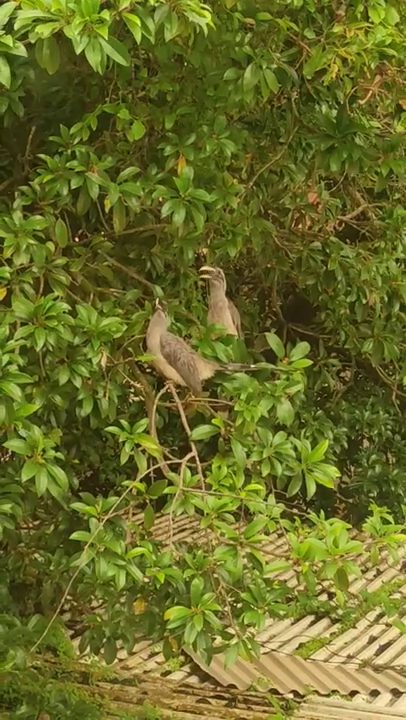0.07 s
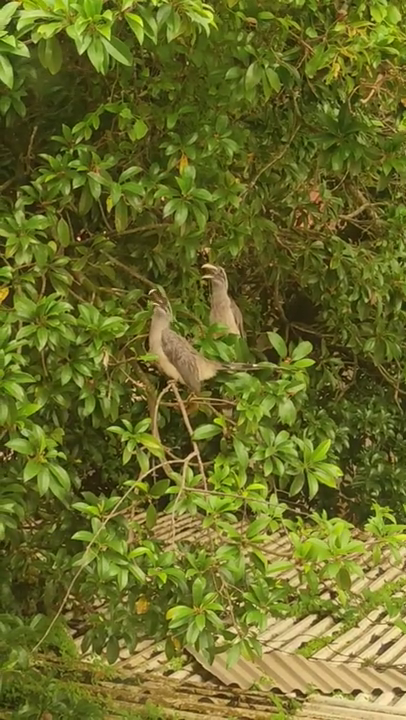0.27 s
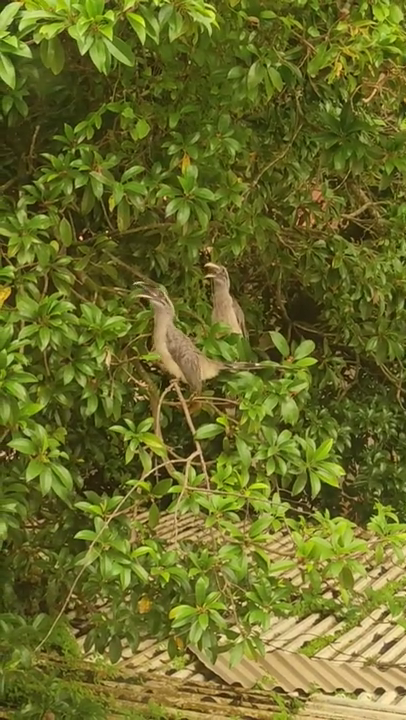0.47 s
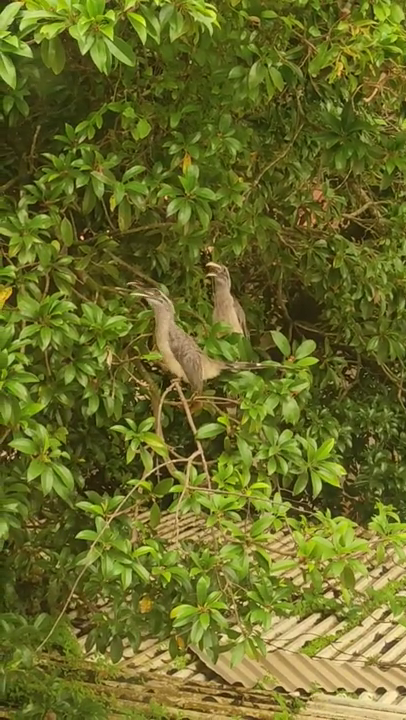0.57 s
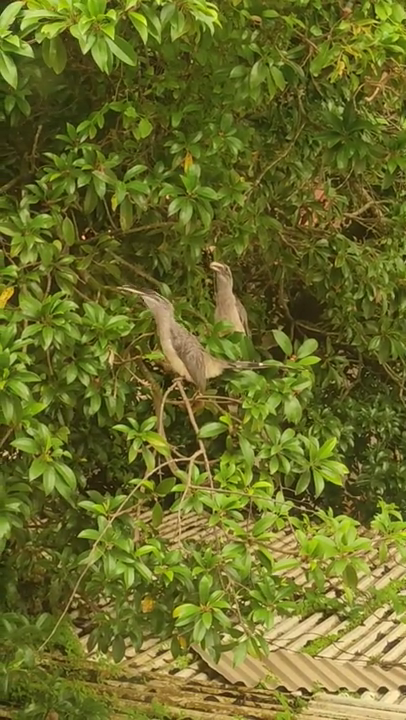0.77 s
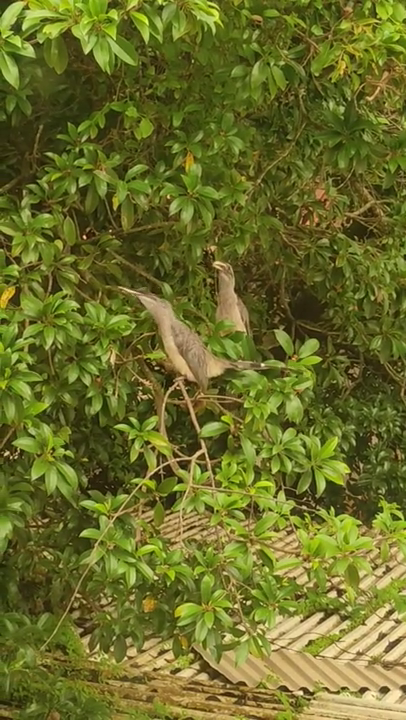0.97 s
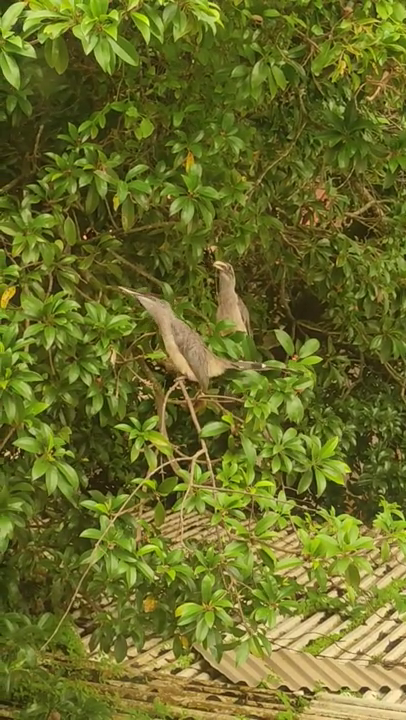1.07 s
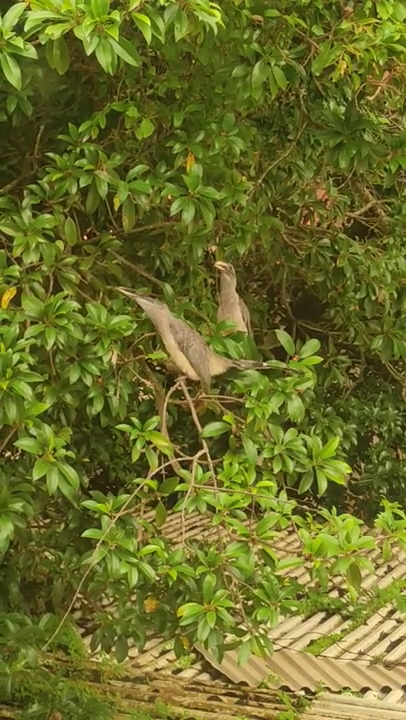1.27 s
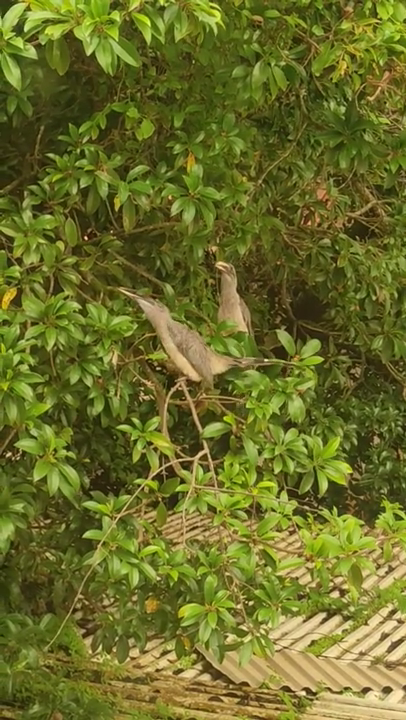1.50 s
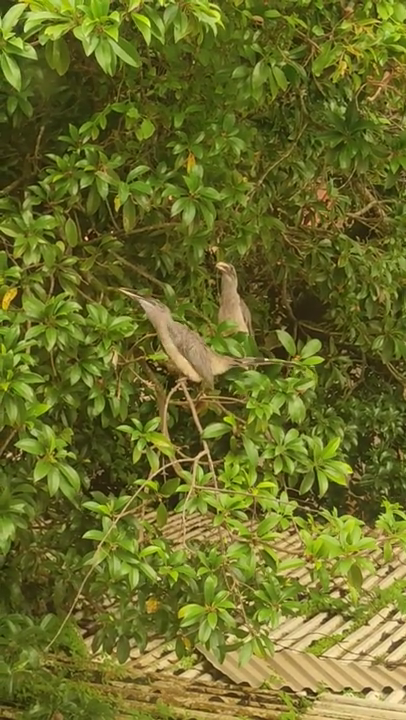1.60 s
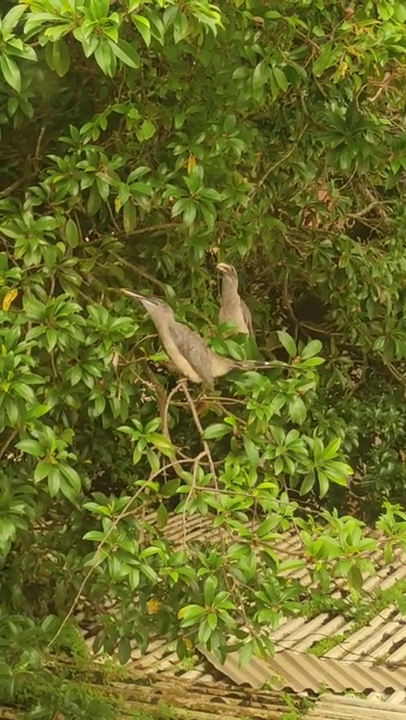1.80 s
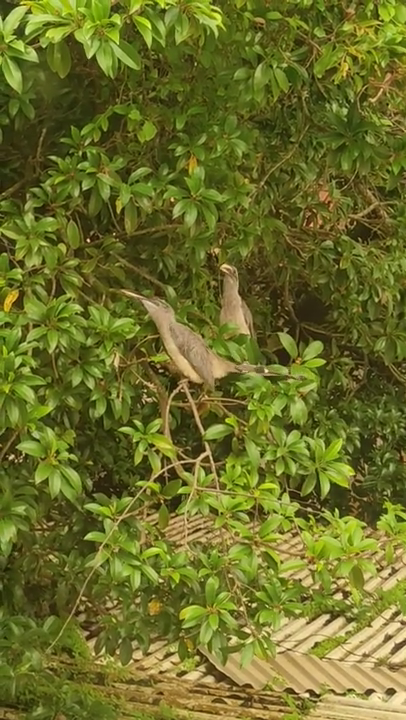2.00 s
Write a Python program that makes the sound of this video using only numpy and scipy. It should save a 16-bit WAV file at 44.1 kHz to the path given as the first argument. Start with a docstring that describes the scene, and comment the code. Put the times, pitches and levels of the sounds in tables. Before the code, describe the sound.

Single raspy, shrill bird squawk sliding downward, echoing softly off foliage, with low far-off traffic rumble

```python
"""Hornbill squeal in a leafy tree

A hornbill gives one harsh falling squeal, heard from some way off by two spaced microphones. One side of the
syrinx slides down and breaks into a third, a quarter and again a third of its pitch; the other cries high, then
drops to a steadier whistle. Both are stacks of overtones with a restless phase, the first with pulsed noise as rasp.
Foliage and roofs echo it as decaying noise, over a low hum of distant traffic made of shaped noise and sines."""
import sys
import numpy as np
from scipy import signal
from scipy.fft import rfft, irfft, next_fast_len
from scipy.io import wavfile
from scipy.ndimage import map_coordinates

SR = 44100
rng = np.random.default_rng(int(sys.argv[2]) if len(sys.argv) > 2 else 0)


def materialize(psi):
    """Save the field psi as 16-bit PCM at rate SR to the path in sys.argv[1].

    A 1-D psi becomes a single channel; in a 2-D psi each row is a channel.
    """
    bounded = np.clip(np.atleast_2d(psi).T, -1, 1)
    quanta = np.round(bounded * 32767).astype(np.int16)
    wavfile.write(sys.argv[1], SR, quanta)


N = 90404  # length in samples

# Unrest of the voice; each depth scales a random curve
JITTER_RATE_HZ = 70  # knots a second of the pitch unrest
FLUTTER_DB, FLUTTER_RATE_HZ = 3.2, 85  # level unrest of each overtone
BLUR_RATE_HZ = 170  # knots a second of the phase unrest


def amp(db):
    """Gain of a dB value."""
    return 10 ** (np.asarray(db) / 20)


def unit(x):
    """x at rms 1."""
    return x / np.sqrt(np.mean(x ** 2) + 1e-20)


def along(points, hz):
    """Read (frequency [Hz], value) points on a log frequency axis."""
    f, v = np.transpose(points)
    return np.interp(np.log(hz + 1), np.log(f + 1), v)


def pitch_and_gain(rows):
    """Pitch [Hz] and gain per sample from (time, pitch, level) rows; silent outside them."""
    s, hz, db = np.transpose(rows)
    t = np.arange(N) / SR
    level_db = np.interp(t, s, db, left=-200, right=-200)
    return np.interp(t, s, hz), amp(level_db)


def wobble(rate):
    """A smooth random curve through normal random knots, rate of them a second."""
    steps = np.arange(0, N + 16, 16)  # read every 16 samples, straight lines between
    knots = rng.standard_normal(1000)
    curve = map_coordinates(knots, [steps * rate / SR], mode="wrap")
    return np.interp(np.arange(N), steps, curve)


def filtered(x, response):
    """Multiply the spectrum of x by a complex response of frequency."""
    m = next_fast_len(N + SR // 2)
    return irfft(rfft(x, m) * response(np.fft.rfftfreq(m, 1 / SR)), m)[..., :N]


def stack(turns, multiples, levels_db, blur):
    """Sum sine overtones of a pitch counted in turns, each with its own flutter and phase blur [rad]; rms 1."""
    total = np.zeros(N)
    for k, db in zip(multiples, levels_db):
        level = amp(db + FLUTTER_DB * wobble(FLUTTER_RATE_HZ))
        phase = 2 * np.pi * (k * turns + rng.random()) + blur * wobble(BLUR_RATE_HZ)
        total += level * np.sin(phase)
    return unit(total)


def main_voice():
    """First side of the syrinx: registers at a fraction of a sliding carrier, rasp pulsing once a cycle."""
    # Carrier that every register divides: (time [s], pitch [Hz], level [dB])
    carrier = [(.19, 2856, -60), (.225, 2878, -46), (.28, 2896, -46.5), (.32, 2870, -41.5),
               (.35, 2786, -42.5), (.38, 2733, -47), (.41, 2696, -48.5), (.465, 2601, -41.5),
               (.52, 2549, -53.5), (.59, 2539, -44), (.68, 2515, -47.5), (.71, 2510, -49.5),
               (.745, 2487, -52.5), (.775, 2457, -69)]
    # Span of each register: (start [s], end [s])
    registers = [(0.185, 0.2682), (0.269, 0.363), (0.356, 0.47), (0.464, .57), (0.562, .69), (0.681, 0.81)]
    # Carrier cycles per register cycle: one column [count], a row per register
    divisions = [3, 4, 3, 3, 3, 3]
    # Overtones 2, 3, ... of each register's pitch, a row per register: relative levels [dB]
    overtones = [
        [-3, 3, -3, -13, 0.5, -21, -13, -5, -16.5, -11.5, -34],
        [-20, -49, 1.5, -5, -1.5, -29, -8.5, -9, -11.5, -31, -5, -36, -39, -32],
        [-17, 0, -21, -15.5, -22, -14.5, -38, -12.5, -25, -31, -21.5, -50, -50],
        [-8.5, -6, -14, -0.5, -23, -11, -11, -25, -28, -33, -26, -44, -37],
        [-17.5, -4, -11.5, 2.5, -15, -6, -23, -20, -23, -25, -27, -36, -44],
        [-1.5, 0.5, 4, -13, -4.5, -12, -8, -27, -14.5, -34, -44, -42, -38],
    ]
    # Rasp under each register's tone: one column, level relative to the tone [dB]
    rasp_levels = [-3, -26, -45, -45, -20, -7]
    # Phase unrest of each register's overtones: one column, depth [rad]
    blurs = [1.6, .7, .3, .3, .8, 2.1]
    # Colour of the rasp: (frequency [Hz], relative level [dB])
    rasp_colour = [(1200, -22), (1900, -9), (2300, -1), (2900, -12), (3300, 0), (3690, -6.5), (3880, -4),
                   (4080, 4), (4280, 9.5), (4450, 3.5), (4680, 1.5), (4890, -1.5), (5300, -9), (6500, -9),
                   (7600, -15), (8500, -13), (10800, -18.5), (11500, -37)]
    jitter_hz = 10.9
    lumps_db, lumps_rate_hz = 1.5, 160  # uneven loudness of the rasp
    blend_s = 0.011  # linear fade centred on each register's start and end

    hz, gain = pitch_and_gain(carrier)
    turns = np.cumsum(hz + jitter_hz * wobble(JITTER_RATE_HZ)) / SR
    t = np.arange(N) / SR
    voice = np.zeros(N)
    for (start, end), rasp_db, blur, division, levels in zip(
            registers, rasp_levels, blurs, divisions, overtones):
        gate = np.clip(np.minimum(t - start, end - t) / blend_s + .5, 0, 1)
        register_turns = turns / division
        tone = stack(register_turns, np.arange(len(levels)) + 2, levels, blur)
        puffs = rng.standard_normal(N) * (1 + np.cos(2 * np.pi * register_turns))
        coloured = filtered(puffs, lambda f: amp(along(rasp_colour, f)))
        rasp = unit(amp(lumps_db * wobble(lumps_rate_hz)) * coloured)
        voice += gate * (tone + amp(rasp_db) * rasp)
    return gain * voice


def whistle():
    """Second side of the syrinx: a cry, a crack as it drops, a whistle and tones between its overtones."""
    # High cry: (time [s], pitch [Hz], level [dB])
    cry = [(.205, 2887, -62), (.225, 2954, -47.5), (.26, 2996, -53), (.29, 2983, -43), (.32, 2880, -57),
           (.35, 2950, -50), (.385, 2970, -59), (.42, 2860, -64)]
    # Overtones 1, 2, ... of the cry: relative level [dB]
    cry_overtones = [0, -2, -22]
    # Shrill crack as the cry drops: (time [s], pitch [Hz], level [dB])
    crack = [(.335, 2733, -62), (.35, 2676, -43.5), (.375, 2693, -56), (.41, 2677, -73), (.44, 2638, -57),
             (.47, 2580, -56)]
    # Overtones 1, 2, ... of the crack: relative level [dB]
    crack_overtones = [-19, 0, -3.4]
    # Steadier whistle: (time [s], pitch [Hz], level [dB])
    steady = [(.335, 1800, -77), (.36, 1787, -64), (.4, 1802, -47), (.46, 1783, -46.5), (.55, 1762, -47),
              (.6, 1754, -46.5), (.64, 1786, -56), (.69, 1754, -57.5), (.72, 1815, -56)]
    # Overtones 1, 2, ... of the whistle: relative level [dB]
    steady_overtones = [-7.5, -1, -10.5, -15.5, -22.5, -26.5, -35]
    # Tones halfway between the whistle's overtones: (time [s], half pitch [Hz], level [dB])
    halfway = [(.36, 904, -78), (.38, 882, -45.5), (.42, 885.2, -43.5), (.45, 874, -47), (.48, 875, -58),
               (.53, 881, -51), (.57, 856, -57)]
    # Odd overtones of the half pitch: (multiple [count], relative level [dB])
    halfway_overtones = [(3, -9), (5, 7), (7, -18), (9, -13.5), (11, -17.5)]
    jitter_share = 0.00367  # share of the pitch
    blur_rad = 0.4

    odd, odd_db = np.transpose(halfway_overtones)
    odd = np.round(odd)
    whole = np.arange(N) + 1  # stack stops at the last level
    parts = [(cry, whole, cry_overtones), (crack, whole, crack_overtones),
             (steady, whole, steady_overtones), (halfway, odd, odd_db)]
    voice = np.zeros(N)
    for rows, multiples, levels in parts:
        hz, gain = pitch_and_gain(rows)
        turns = np.cumsum(hz * (1 + jitter_share * wobble(JITTER_RATE_HZ))) / SR
        voice += gain * stack(turns, multiples, levels, blur_rad)
    return voice


def trees(x):
    """Scattered echo of foliage and roofs: noise tails in which each frequency dies at its own speed."""
    # Echo decay: (frequency [Hz], time to fall 60 dB [s])
    decay = [(1500, 0.73), (3500, 0.56), (4500, 0.58), (6000, 0.53), (11000, 0.32)]
    delay_s = .008
    hz, t, z = signal.stft(rng.standard_normal((2, SR)), SR, nperseg=256)
    fade = amp(-60 * t / along(decay, hz)[:, None])
    tail = signal.istft(z * fade, SR, nperseg=256)[1]
    late = np.pad(x, (round(delay_s * SR), 0))[None]
    return signal.fftconvolve(late, tail / np.linalg.norm(tail[0]), axes=1)[:, :N]


def traffic():
    """Far rumble, its left-right likeness varying with frequency, and a few wavering sine hums."""
    # Rumble spectrum: (frequency [Hz], relative level per Hz [dB])
    spectrum = [(12, -47), (30, -2), (42, -5.5), (70, -3), (122, -4), (153, -1.5), (238, -7.5), (282, -8.5),
                (372, -8), (491, -9), (534, -8), (1380, -21), (1920, -21.5), (2760, -27), (15500, -45)]
    # Likeness of the two microphones: (frequency [Hz], correlation [-1 to 1])
    likeness = [(60, 0.15), (130, 0.72), (290, 0.79), (640, 0.12), (1410, -0.15), (3100, 0.14),
                (6820, -0.26), (15000, 0.3)]
    # Balance of the rumble: (frequency [Hz], left minus right [dB])
    balance = [(60, 5), (180, -0.5), (550, -3), (1650, 2.5), (4970, -1.5), (15000, 1)]
    # Hums, equal at both microphones: (frequency [Hz], peak level [dB])
    hum_rows = [(80.7, -69.5), (150.7, -79.5), (274.5, -78), (489.9, -70)]
    rumble_db, swell_db = -57, 0.14
    hum_waver_hz, hum_waver_db = 4, 5

    def mid_side(hz):
        """Share the spectrum between common and opposed noise to set the likeness."""
        turn = np.arccos(np.clip(along(likeness, hz), -1, 1)) / 2
        return amp(along(spectrum, hz)) * [np.cos(turn), np.sin(turn)]

    mid, side = filtered(rng.standard_normal((2, N)), mid_side)
    pair = np.array([mid + side, mid - side]) / np.std(mid)
    pair = filtered(pair, lambda hz: amp(np.outer([.5, -.5], along(balance, hz))))
    hums = np.zeros(N)
    for hz, db in hum_rows:
        level = amp(db + hum_waver_db * wobble(6.59))
        turns = np.cumsum(hz + hum_waver_hz * wobble(9.0)) / SR
        hums += level * np.sin(2 * np.pi * turns)
    return amp(rumble_db + swell_db * wobble(3.4)) * pair + hums


def scene():
    """The direct call reaches the right microphone first; echo and traffic join it."""
    left_lag_s = 0.000606
    echo_db, pan_db = 1, -1.05  # pan is left minus right
    call = main_voice() + whistle()
    direct = filtered(call, lambda hz: np.exp(-2j * np.pi * np.outer([left_lag_s, 0], hz)))
    pan = amp([[pan_db / 2], [-pan_db / 2]])
    return (direct + amp(echo_db) * trees(call)) * pan + traffic()


def record(dry):
    """Keep nothing above the band limit."""
    top_hz = 15665
    return filtered(dry, lambda hz: hz < top_hz)


dry = scene()
out = record(dry)
materialize(out)
```